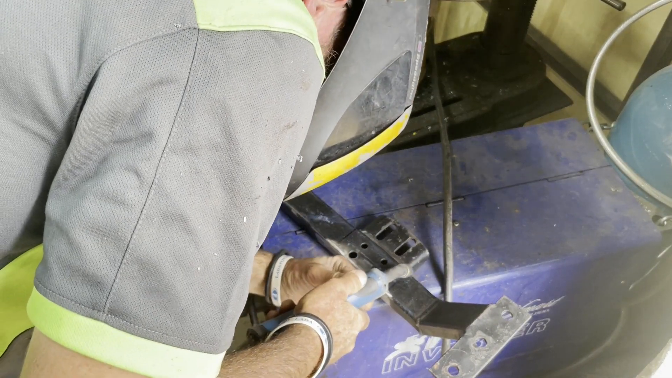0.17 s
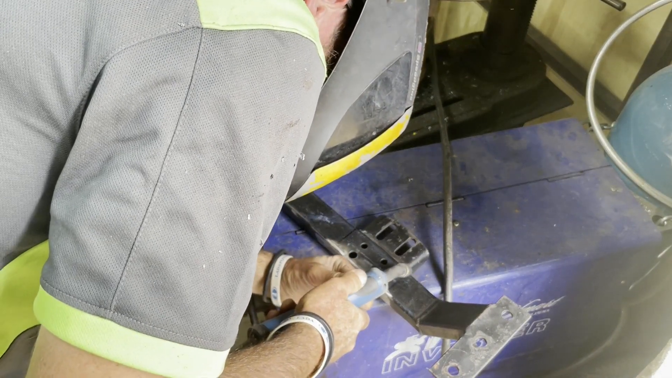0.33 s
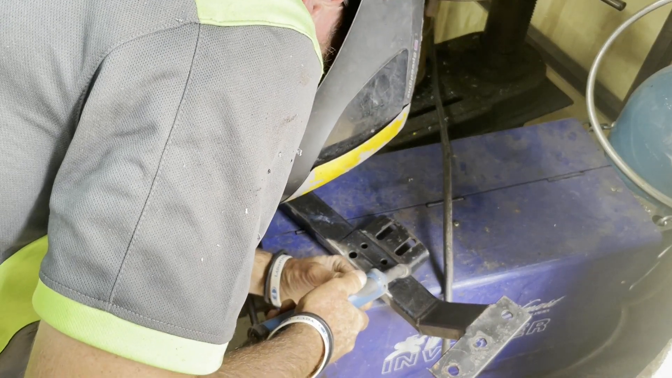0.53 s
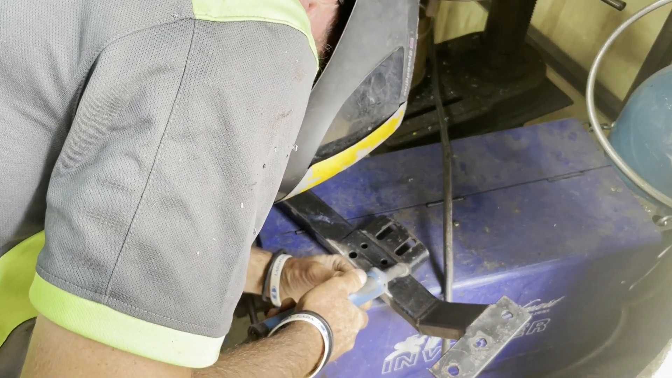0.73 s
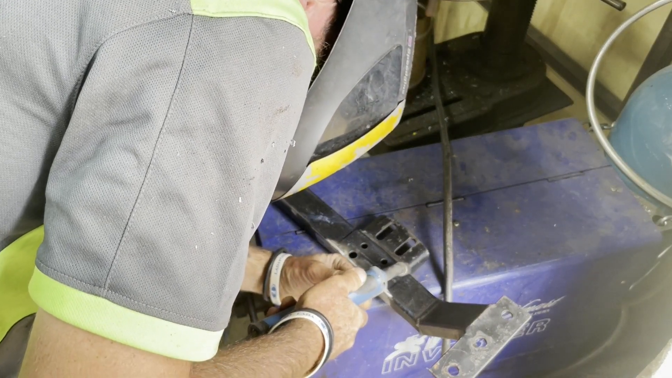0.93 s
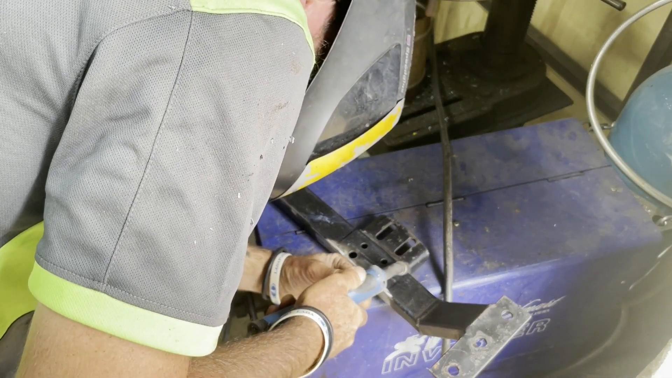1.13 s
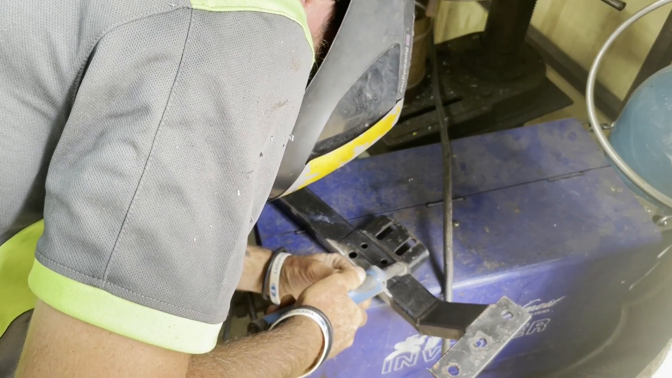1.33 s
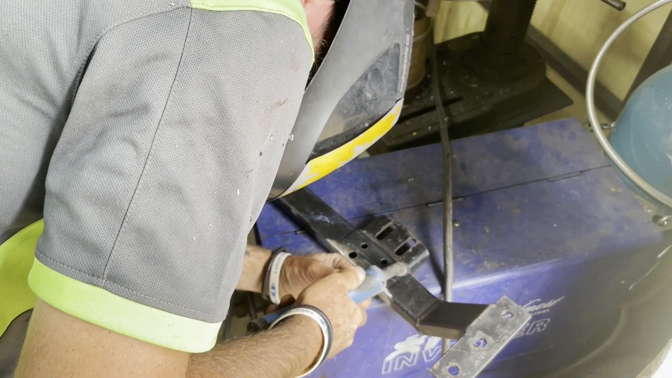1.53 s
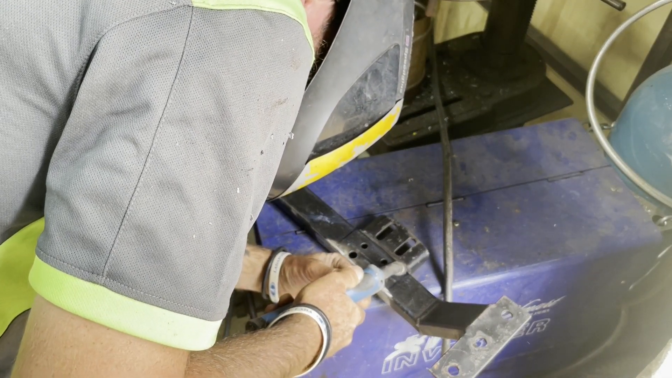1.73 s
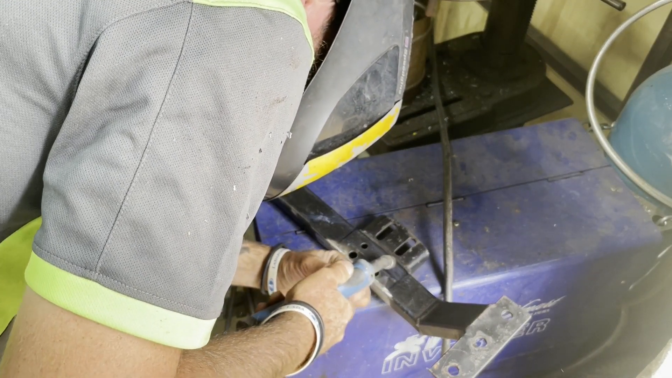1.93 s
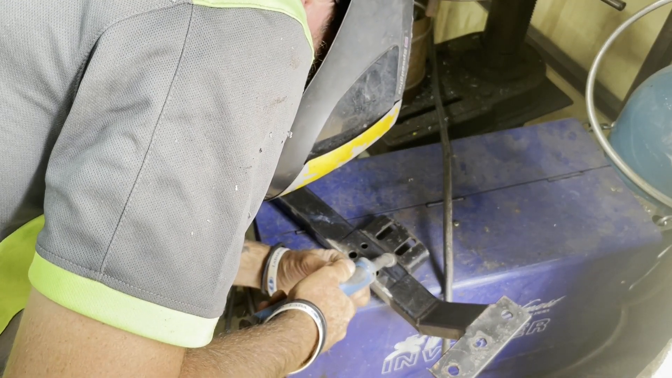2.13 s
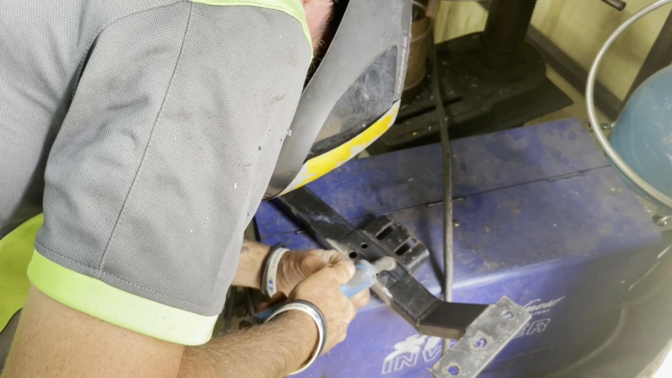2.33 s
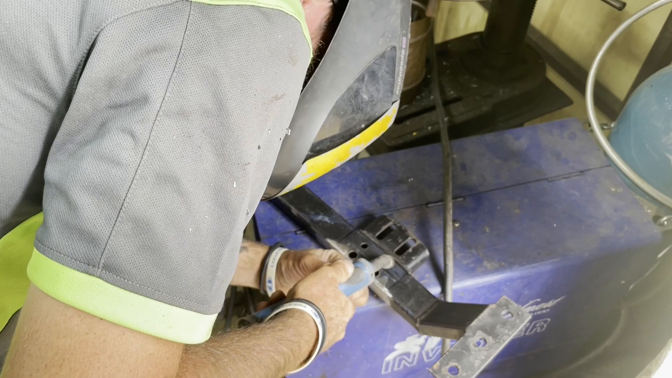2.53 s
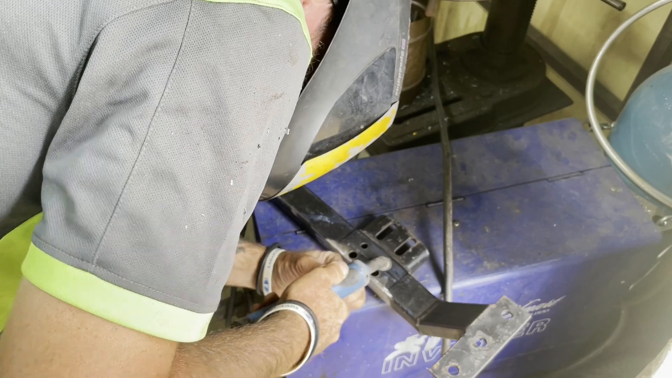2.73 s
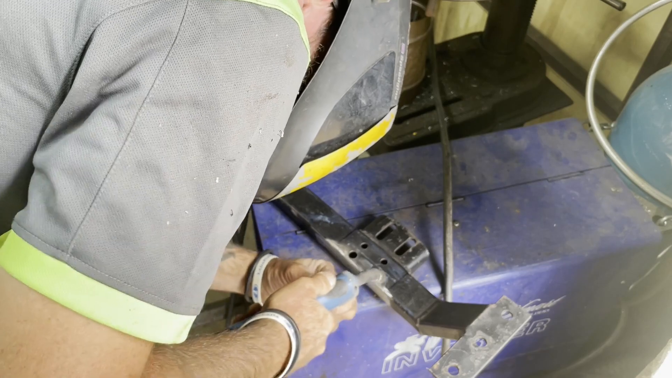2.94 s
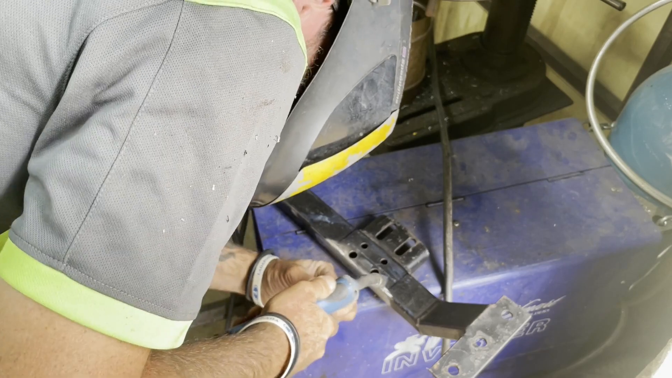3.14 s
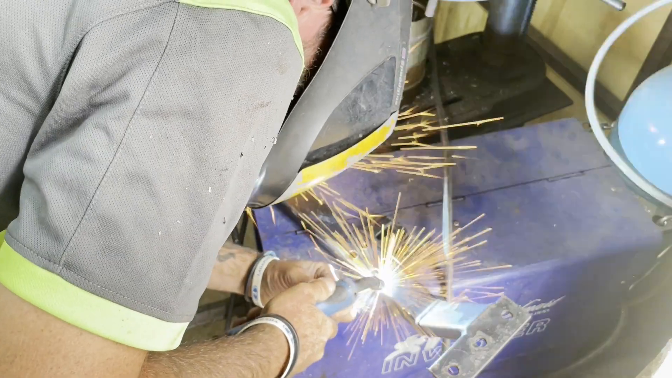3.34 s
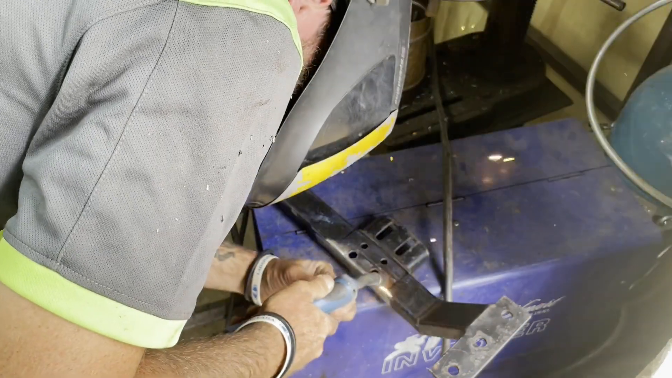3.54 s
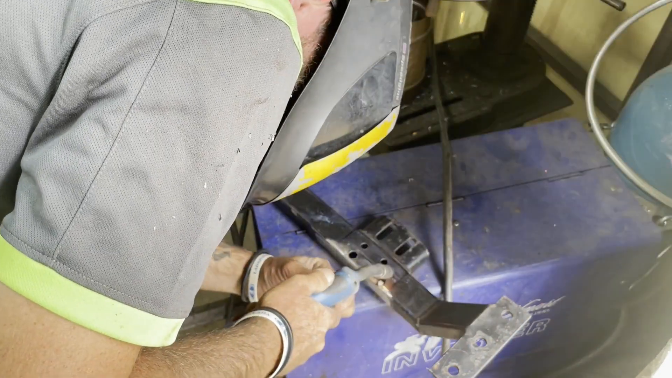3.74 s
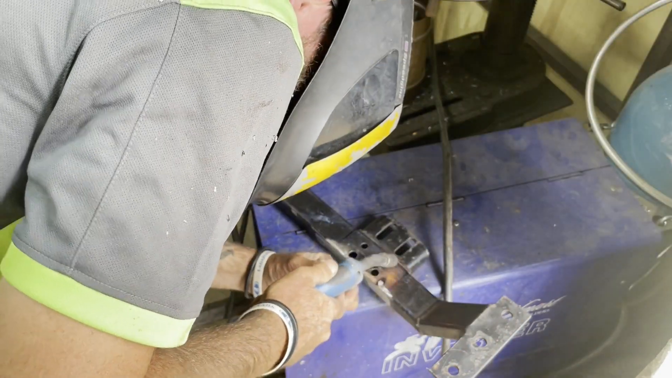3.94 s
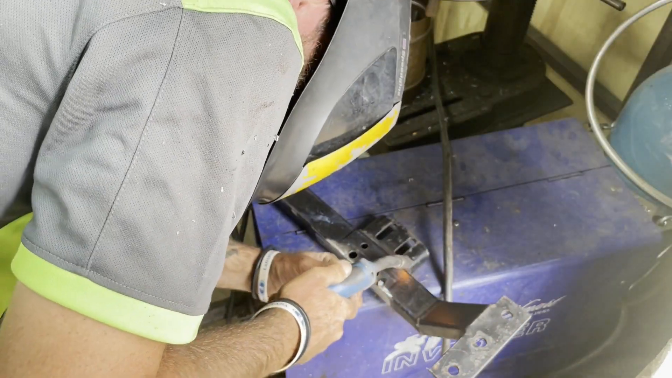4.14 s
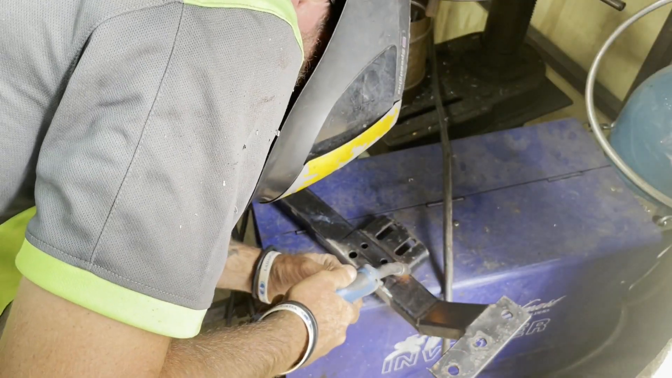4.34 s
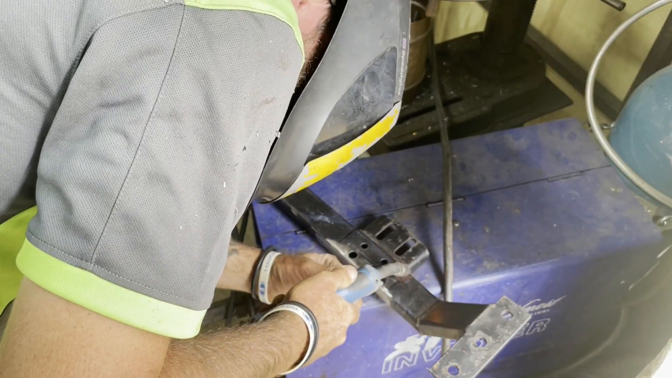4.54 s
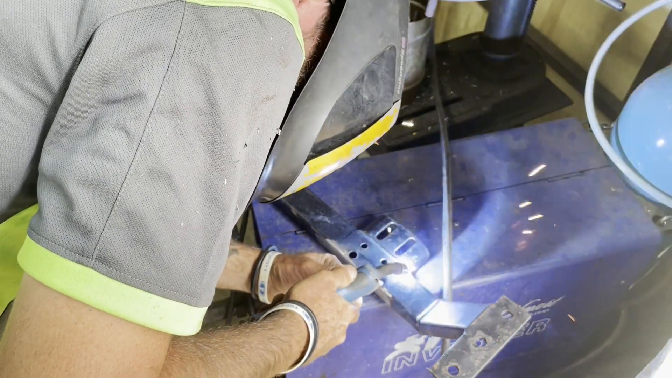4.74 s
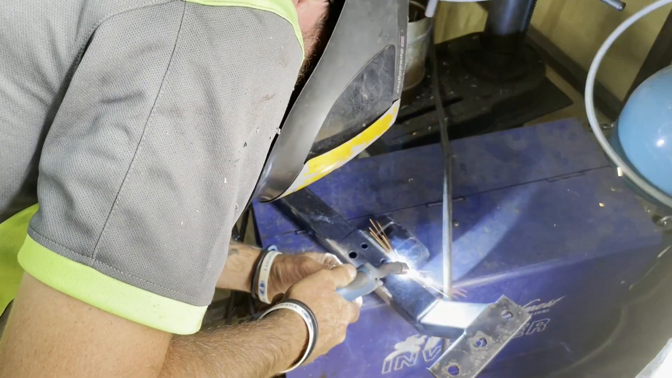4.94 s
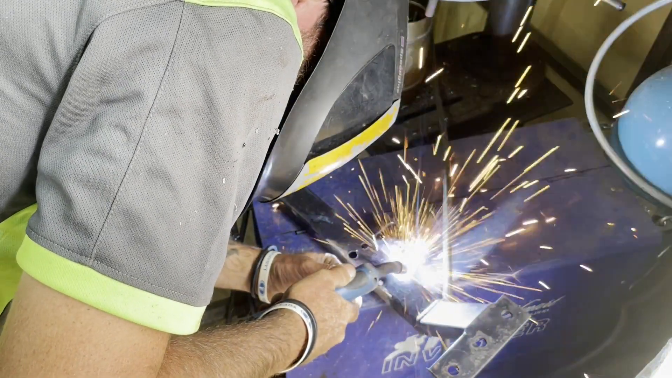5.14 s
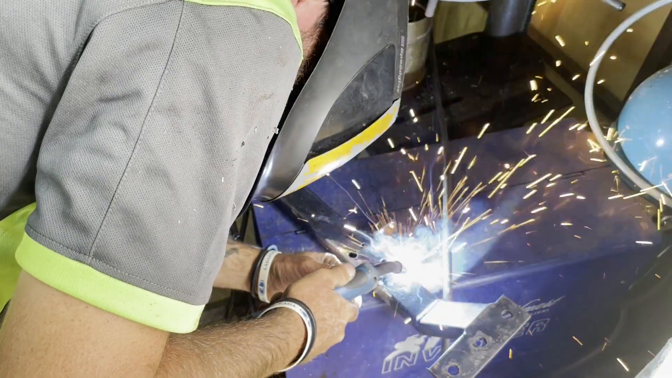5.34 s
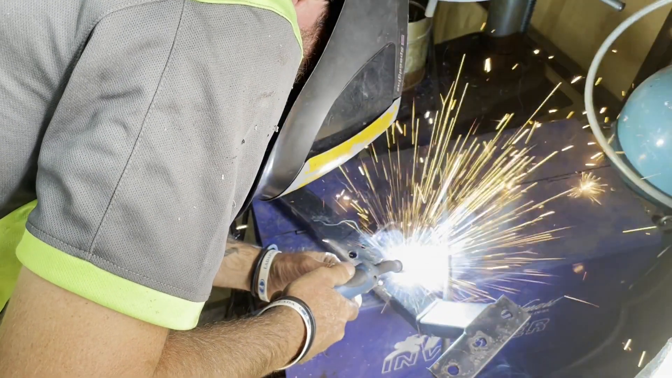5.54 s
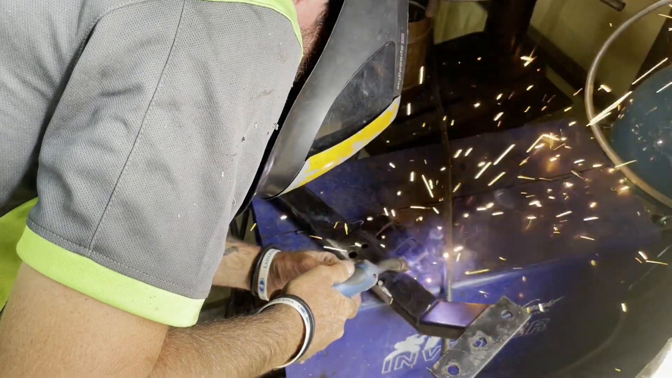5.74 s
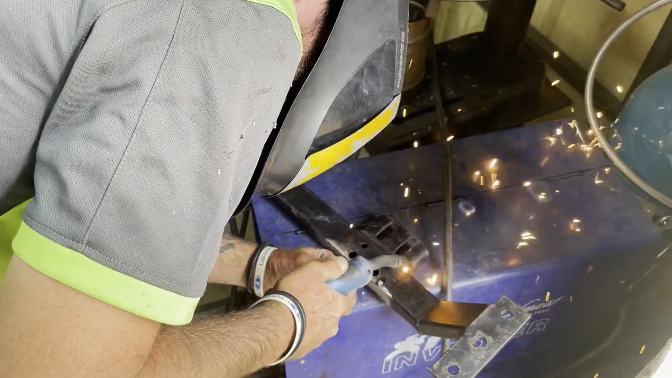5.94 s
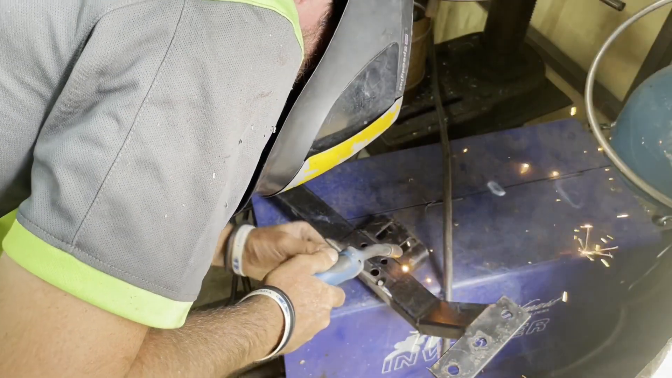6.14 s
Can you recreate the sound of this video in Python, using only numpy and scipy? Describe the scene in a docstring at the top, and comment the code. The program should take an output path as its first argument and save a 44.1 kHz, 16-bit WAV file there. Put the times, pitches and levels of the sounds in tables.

```python
"""A wire-feed welder, close by in a home workshop; its fan hums throughout. At 1.4 s a valve clacks and
shielding gas hisses for a second. At 3.3 s the wire strikes once and the gas flows again. From 4.6 s the
arc sizzles and pops; the recorder's filters smear each crack into a falling low chirp, and its gain, a set
curve here, ducks and lifts the whole background around the loud pops. Near 5.8 s the arc dies, a thin
whistle rises, and the still-running gas is heard faintly over the ducked background."""
import sys
import numpy as np
from scipy import signal
from scipy.fft import irfft
from scipy.io import wavfile
from scipy.ndimage import uniform_filter1d

SR = 44100
rng = np.random.default_rng(int(sys.argv[2]) if len(sys.argv) > 2 else 0)


def master_out(mix):
    """Clip the mix to full scale and print it as 16-bit PCM to the path in sys.argv[1]."""
    frames = np.transpose(np.atleast_2d(mix))
    ceiling = np.clip(frames, -1, 1)
    pcm = np.round(ceiling * 32767).astype(np.int16)
    wavfile.write(sys.argv[1], SR, pcm)


N = 272398
T = np.arange(N) / SR

# Each row: start in seconds, strength in dB, thump in dB, thump rise in ms, polarity +1 or -1.
# The row at 4.655 s is the slow second swing of the first big thump, not a separate pop.
ARC_POPS = [(4.6295, -8, -8, 6, 1), (4.6395, -7, 3, 2.27, 1), (4.655, -27, 1, 16, -1),
            (4.717, -34, -30, 4, 1), (4.848, -20, -27.5, 2.4, -1), (4.9401, -9, -38, 6, 1),
            (4.944, -8, -40, 6, 1), (4.9539, -2, -40, 6, -1), (5.0032, -4, -39, 6, 1),
            (5.0074, -5, -29, 6, -1), (5.0091, -6, -40, 6, 1), (5.0128, -2, -17, 6, -1),
            (5.0177, -5, -40, 6, 1), (5.0209, -3, -24.5, 5.5, -1), (5.0244, -8, -9.5, 4, -1),
            (5.0259, -2, -40, 6, 1), (5.0302, -5, 4.5, 1.8, 1), (5.0549, -4, -0.5, 6, 1),
            (5.1132, -5, -14.5, 2.5, -1), (5.138, -7, -37, 5.5, -1), (5.1425, -11, -40, 6, 1),
            (5.1595, -3, -8.5, 2.4, 1), (5.1727, -5, -36, 6, -1), (5.1813, -5, -29.5, 6, 1),
            (5.189, -5, -6.5, 2.1, -1), (5.1977, -3, -4.5, 2.2, 1), (5.2226, -7, 3.5, 2.17, -1),
            (5.2427, -8, -11.5, 3.7, -1), (5.265, -7, 4.5, 2.8, 1), (5.2826, -5, 3.5, 1.8, -1),
            (5.3003, -11, -3.5, 2, 1), (5.3184, -7, -7, 2.3, 1), (5.3384, -9, 1, 1.74, -1),
            (5.3578, -13, -1, 3.2, 1), (5.3665, -13, -9, 1.5, 1), (5.3769, -11, -9, 4.5, 1),
            (5.3872, -14, -24.5, 3.4, -1), (5.4059, -11, -18.5, 4.2, -1), (5.4192, -6, -2, 2.06, -1),
            (5.4384, -9, -5, 2.6, 1), (5.4475, -12, -36.5, 6, -1), (5.4587, -12, -11.5, 2.2, 1),
            (5.4691, -13, -40, 6, 1), (5.4796, -12, -40, 6, -1), (5.4895, -10, -21.5, 2.5, -1),
            (5.5014, -9, -2, 2.4, -1), (5.532, -4, 3, 1.7, 1), (5.5417, -7, 3.5, 1.7, -1),
            (5.5535, -15, -39.5, 6, -1), (5.5652, -12, -1.5, 1.54, 1), (5.5769, -10, -7.5, 1.2, -1),
            (5.5875, -16, -18, 2.7, -1), (5.6199, -17, -33, 6, 1), (5.6297, -17, -26, 4.4, -1),
            (5.6407, -10, -40, 6, 1), (5.6524, -15, -30, 6, -1), (5.6787, -23, -35, 3.2, 1),
            (5.685, -11, -40, 6, -1), (5.6985, -10, -34, 6, 1), (5.7098, -9, -21, 12, -1),
            (5.7645, -37, -19.5, 3.8, -1)]
# Each row: frequency in Hz, density in dB.
CRACK_SPECTRUM = [(600, -5), (2000, -2), (4000, -3), (5500, -6.5), (7000, 5), (8600, -25), (10000, 2),
                  (13000, 1), (16500, -14.5)]
# Each row: frequency in Hz, left-right likeness from 0 to 1.
ARC_LIKENESS = [(60, 0.99), (500, 1), (1000, 0.51), (2400, 0.86), (5000, 0.48), (8000, 0.39), (13000, 0.95)]


def cracks(boost_db=1.5):
    """Each pop of the arc is an impulse through a causal filter, its phase scattered per pop and side."""
    out, hz = np.zeros((2, N)), np.fft.rfftfreq(256, 1 / SR)
    log_gain = np.log(gain_of(value_at(CRACK_SPECTRUM, hz)))
    minimum_phase = -signal.hilbert(np.r_[log_gain, log_gain[-2:0:-1]]).imag[:len(hz)]
    phase = minimum_phase - 2 * np.pi * hz * 20 / SR  # 20 samples late
    likeness = np.clip(value_at(ARC_LIKENESS, hz), 0, 1)
    for start_s, db, *_ in ARC_POPS:
        shared, *per_side = uniform_filter1d(rng.standard_normal((3, len(hz))), 6, 1)
        scatter = 1.2 * shared + 2.2 * np.sqrt(1 - likeness) * per_side
        click = irfft(np.exp(log_gain + 1j * (phase + scatter)) * stereo_gains(hz))
        add(out, start_s - 0.0005, gain_of(db + boost_db) * click / abs(click).max())
    return out


def thumps(floor_hz=11.0, sweep_cycles=0.921, start_rad=3.8, ring_hz=53):
    """The recorder's allpass filters smear each pop into a low chirp that falls as 1 / time, then rings."""
    out, t = np.zeros((2, N)), np.arange(1, 9000) / SR
    fall_s = np.minimum(t, sweep_cycles / (ring_hz - floor_hz))
    cycles = floor_hz * fall_s + sweep_cycles * np.log(1000 * fall_s) + ring_hz * (t - fall_s)
    chirp = np.sin(2 * np.pi * cycles + start_rad + np.array([[0.2], [-0.2]]))  # right trails
    chirp *= gain_of(np.array([[15], [-15]]) * np.exp(-t / 0.0011))  # the bright start leans left
    decay = 0.42 * np.exp(-t / 0.0026) + 0.59 * np.exp(-t / 0.018) + 0.034 * np.exp(-t / 0.033)
    chirp *= decay * onset(t, 0.0011)
    for start_s, _, db, rise_ms, polarity in ARC_POPS:
        add(out, start_s, polarity * gain_of(db) * chirp * onset(t, rise_ms / 1000))
    return out


# Each row: time in seconds, level in dB.
SIZZLE_CURVE = [(4.6, -120), (4.62, -28), (4.662, -39), (4.768, -38), (4.872, -26), (5.004, -35.5),
                (5.09, -31.5), (5.236, -31.5), (5.418, -36), (5.528, -35.5), (5.66, -42), (5.732, -40.5),
                (5.856, -58.5), (6.0, -79)]
# Each row: start in seconds, level in dB, hold in ms, T60 in seconds, relative thud in dB, dullness 0-1.
ARC_SPITS = [(3.330, -22, 6.5, 0.022, -34, 0.46), (3.333, -14.5, 6.1, 0.079, 2.5, 0.7),
             (3.350, -24.5, 3.9, 0.38, -0.5, 0.54), (4.621, -29.5, 3, 0.02, -19, 0.4),
             (4.893, -35, 6.2, 0.022, -12, 0.6), (4.905, -25, 19, 0.032, -18, 0.33),
             (4.930, -30, 3.7, .015, -18.5, 0.2), (4.939, -22.5, 23, 0.033, -26.5, 0.1),
             (4.975, -19.5, 12, 0.04, -29.5, 0), (4.990, -25.5, 8.2, .03, -21, 0.3),
             (4.998, -29.5, 25, .01, -18, 0.03), (5.055, -21.5, 3.6, 0.033, -16, 0),
             (5.158, -22, 2.1, 0.047, -17, .2), (5.196, -26, 6.7, 0.086, -17, 0),
             (5.265, -21, 16.6, 0.011, -17, 0.25), (5.532, -27.5, 16, .015, -20.5, 0.5)]
# Burning arc and duller cold strike. Each row: frequency in Hz, density in dB.
ARC_SPECTRUM = [(290, -54), (500, -27), (787, -7), (911, -16.5), (1200, -10.5), (1410, -9), (1610, -5),
                (1950, -9), (3300, -5), (5430, -8.5), (6960, -3), (8800, -7), (12900, 0), (15800, -14),
                (16500, -53)]
STRIKE_SPECTRUM = [(530, -43), (900, -5), (1110, -9.5), (2560, -1), (3650, -5), (4380, 1.5), (8450, -14),
                   (12200, -8.5), (15300, -9.5), (15900, -11.5), (16500, -46.5)]
# Modes of the struck part. Each row: frequency in Hz, level in dB, T60 in seconds.
THUD_MODES = [(95, -16, .08), (155, -3, 0.033), (252, 3.5, 0.022), (424, -0.5, 0.032), (560, -2.5, 0.032),
              (817, -10, 0.028)]


def arc(echo_db=-25.5, echo_t60_s=0.04):
    """The arc fries and spits; each spit mixes bright and dull noise over a dry thud."""
    bright, dull, thuds, t = level_curve(SIZZLE_CURVE), np.zeros(N), np.zeros(N), T[:4000]
    thud = sum((-1) ** k * gain_of(db - 60 * t / t60_s) * np.sin(2 * np.pi * hz * t)
               for k, (hz, db, t60_s) in enumerate(THUD_MODES))
    for start_s, sharp, bass, dullness in burst_envelopes(ARC_SPITS, rise_s=0.00073, bass_stretch=1):
        add(bright, start_s, sharp * np.sqrt(1 - dullness))
        add(dull, start_s, sharp * np.sqrt(dullness))
        add(thuds, start_s + 0.00129, -bass.max() * thud)
    for start_s, db, *_ in ARC_POPS:  # echo tails off bench and walls
        add(bright, start_s, gain_of(db + echo_db - 60 * t / echo_t60_s))
    sputter = unit_rms(gain_of(1.8 * wander(N, 30)))
    fry = bright * noise(ARC_SPECTRUM, patchy_db=1.0, flicker_db=2.0, likeness=ARC_LIKENESS)
    fry += dull * noise(STRIKE_SPECTRUM, patchy_db=1.0, likeness=ARC_LIKENESS)
    return fry * sputter + thuds


# Each row: start in seconds, level in dB, hold in ms, T60 in seconds, relative case ring in dB.
VALVE_CLACKS = [(1.438, -29, 4, 0.19, -3.5), (2.44, -52, 5.3, 0.21, 13.5), (2.826, -60.5, 6, 0.34, -12),
                (3.274, -31, 9.3, 0.28, -4), (3.465, -41, 1.4, 0.02, 12), (3.493, -49, 1, .02, -5),
                (3.565, -39.5, 1.5, 0.026, 13), (3.572, -63.5, 42, 0.34, 28.5),
                (4.36, -67.5, 3.9, 0.14, 31.5), (4.587, -31.5, 4.9, 0.41, -3.5),
                (4.786, -59, 28, 0.18, 16.5), (5.93, -68.5, 5.3, .04, 10.5)]
# Each row: frequency in Hz, density in dB.
CLACK_SPECTRUM = [(710, -43.5), (1200, -10.5), (3150, -14.5), (4730, -9.5), (5630, -18), (6290, -3.5),
                  (7830, -0.5), (9430, -8.5), (10200, -1), (13300, -16), (14200, -17), (15600, -2.5),
                  (16500, -31)]
# Each row: frequency in Hz, width in Hz, level in dB.
CASE_MODES = [(204, 170, -6.5), (378.5, 81, -4.5), (600, 150, -3), (960, 180, -4.5)]


def clacks(snap_s=0.003, upper_ring_s=0.02):
    """Valve clacks and small knocks ring the welder's case; its upper modes die first."""
    bright, upper, low = np.zeros((3, N))
    for start_s, sharp, bass in burst_envelopes(VALVE_CLACKS, rise_s=0.0013, bass_stretch=0.75):
        t = T[:len(sharp)]
        add(bright, start_s, sharp * (1 + 1.6 * np.exp(-t / snap_s)))  # the plunger snaps home
        add(upper, start_s, bass * np.exp(-t / upper_ring_s))
        add(low, start_s, bass)
    clack = bright * noise(CLACK_SPECTRUM, patchy_db=2.5)
    return clack + low * resonances(CASE_MODES[:2]) + upper * resonances(CASE_MODES[2:])


# Each row: hiss becomes audible in seconds, starts to fade in seconds, hiss in dB, nozzle tones in dB.
# The last row is the still-running gas, heard faintly after the arc.
GAS_FLOWS = [(1.432, 2.43, -43, -46), (3.422, 4.38, -45, -44), (5.776, 6.3, -65, -65)]
# Each row: frequency in Hz, density in dB.
HISS_SPECTRUM = [(710, -36.5), (1200, -9.5), (1410, -20.5), (1600, -11), (1820, -6.5), (2450, -9),
                 (3970, -11.5), (4280, -14.5), (5330, -11), (7250, -14.5), (9330, -13.5), (10400, -16.5),
                 (15100, -21), (16000, -33), (16500, -57)]
# Each row: frequency in Hz, width in Hz, level in dB.
NOZZLE_MODES = [(1607, 86, -6), (1816, 270, -0.5), (2061, 97, -7)]
# Each row: peak in seconds, half length in seconds, band centre in Hz, level at full flow in dB.
HISS_SWELLS = [(1.483, .03, 9600, -49), (1.6, .2, 12400, -49.5), (1.63, .2, 6000, -48.5),
               (1.837, .08, 9400, -54), (2.34, .12, 9300, -48.5), (2.43, .08, 13400, -58),
               (3.44, .05, 9450, -45), (3.454, .1, 5840, -46), (3.617, .1, 13400, -54),
               (4.05, .25, 9500, -53), (4.13, .06, 13300, -54), (4.344, .12, 5680, -46),
               (4.392, .12, 13000, -49.5), (6.147, .15, 13000, -51)]


def gas(swell_q=5.7):
    """Shielding gas hisses and sounds fuzzy tones in the nozzle; broad bands come and go."""
    hiss_gain = gas_envelope(level_column=2, rise_s=0.046, fall_db_per_s=67)
    nozzle_gain = gas_envelope(level_column=3, rise_s=0.075, fall_db_per_s=142)
    swells = sum(bell(peak_s, half_s, db) * resonances([(hz, hz / swell_q, 0)])
                 for peak_s, half_s, hz, db in HISS_SWELLS)
    hiss = hiss_gain * noise(HISS_SPECTRUM, patchy_db=2.0)
    tones = nozzle_gain * unit_rms(resonances(NOZZLE_MODES))
    return hiss + tones + swells * hiss_gain / hiss_gain.max()


def gas_envelope(level_column, rise_s, fall_db_per_s):
    """Each stretch of audible gas builds, holds and fades."""
    gain = np.zeros(N)
    for row in GAS_FLOWS:
        heard_s, fading_s = np.maximum(T - row[0], 0), np.maximum(T - row[1], 0)
        gain += onset(heard_s, rise_s) * gain_of(row[level_column] - fall_db_per_s * fading_s)
    return gain


# Each row: start and rise time in seconds, first and last pitch in Hz, first and last level in dB.
WHISTLE_GLIDES = [(3.465, 0.021, 3150, 3350, -40, -37.5), (5.725, .155, 3140, 3580, -53, -46)]


def whistles(curl=1.3, octave_db=-16, break_s=0.0088, drop_db=-18):
    """Thin rough whistles rise ever faster and swell, then break off to a faint tail."""
    out = np.zeros(N)
    for start_s, rise_s, first_hz, last_hz, first_db, last_db in WHISTLE_GLIDES:
        t = np.arange(0, 1.6 * rise_s, 1 / SR)
        hz = first_hz + (last_hz - first_hz) * np.minimum(t / rise_s, 1) ** curl
        hz *= 1 + 0.02 * wander(len(t), 60)
        phase = 2 * np.pi * np.cumsum(hz) / SR
        db = np.interp(t, [0, rise_s, rise_s + break_s], [first_db, last_db, last_db + drop_db])
        flutter_db = 3.5 * wander(len(t), 150)
        tone = gain_of(db + flutter_db) * (np.sin(phase) + gain_of(octave_db) * np.sin(2 * phase))
        add(out, start_s, np.sqrt(2) * tone * signal.windows.tukey(len(t), 0.2))
    return out * gain_of([[1.5], [-1.5]])


# Each row: frequency in Hz, density in dB.
FAN_SPECTRUM = [(41, -29.5), (70, -11), (128, -2), (228, -9), (305, -27), (341, -12.5), (417, -11.5),
                (446, -14.5), (667, -15), (745, -11.5), (911, -17), (2840, -25.5), (5810, -39), (6790, -40),
                (14500, -53.5)]
# Each row: frequency in Hz, width in Hz, level in dB.
FAN_MODES = [(630, 19, -65), (766, 14, -63.5), (3490, 610, -72.5)]
# The recorder's automatic gain around the loud pops, as a set curve. Each row: time in seconds, gain in dB.
DUCKING_CURVE = [(4.62, 1.5), (4.7, -5), (5.0, -0.5), (5.3, 8.5), (5.8, -17), (6.18, -19.5)]
# Each row: peak in seconds, half length in seconds, level in dB. The one at 4.78 s is the big thump's tail.
RUMBLE_SWELLS = [(.26, 0.061, -42.5), (0.408, 0.054, -43), (0.653, 0.1, -47.5), (.87, 0.047, -48),
                 (1.112, .03, -45), (1.34, 0.069, -45), (1.56, 0.034, -41), (1.697, .03, -47),
                 (1.85, .05, -58), (2.05, .08, -59), (2.55, .2, -58), (3.79, 0.048, -55),
                 (4.55, 0.099, -59), (4.78, .07, -35), (4.97, .04, -51)]


def workshop(hum_hz=336, hum_db=-54.5, whine_hz=15150, whine_db=-83.5, fan_db=-48, rumble_db=-66.5):
    """Steady fan, hum, whine and rumble, ducked and lifted by the recorder's gain, plus low swells."""
    waver = wander(N, 3000)
    hum = gain_of(hum_db + 1.7 * waver) * np.sqrt(2) * np.sin(2 * np.pi * hum_hz * T + 0.25 * waver)
    whine = gain_of(whine_db) * np.sqrt(2) * np.sin(2 * np.pi * whine_hz * T + 1.2 * waver)
    fan = gain_of(fan_db) * noise(FAN_SPECTRUM, patchy_db=2.0) + resonances(FAN_MODES)
    ducking = level_curve(DUCKING_CURVE)
    rumble_gain = gain_of(rumble_db) * ducking + sum(bell(*row) for row in RUMBLE_SWELLS)
    rumble = unit_rms(resonances([(58.7, 19.3, 0)]).mean(0)) * rumble_gain
    low_cut = signal.butter(4, 40, "high", fs=SR, output="sos")
    return signal.sosfilt(low_cut, (fan + hum + whine) * ducking + rumble)


# Each row: frequency in Hz, left-right likeness from 0 to 1.
ROOM_LIKENESS = [(60, 0.99), (380, 0.88), (800, 0.45), (1400, 0.6), (2400, 0.85), (6000, 0.45), (9000, 1),
                 (15000, 0.99)]


def noise(spectrum, patchy_db, flicker_db=0.0, likeness=ROOM_LIKENESS):
    """Stereo noise of rms 1 with drifting spectral patches and wide-band flicker."""
    frames, hz = N // 128 + 5, np.fft.rfftfreq(512, 1 / SR)
    left_re, left_im, own_re, own_im, patches = rng.standard_normal((frames, 257, 5)).T
    patches = unit_rms(uniform_filter1d(uniform_filter1d(patches, 6, 0), 24, 1))
    shared = np.clip(value_at(likeness, hz), -1, 1)[:, None]
    left = left_re + 1j * left_im
    right = shared * left + np.sqrt(1 - shared ** 2) * (own_re + 1j * own_im)
    db = value_at(spectrum, hz)[:, None] + patchy_db * patches + flicker_db * rng.standard_normal(frames)
    bins = np.array([left, right]) * gain_of(db) * stereo_gains(hz)[..., None]
    return unit_rms(signal.istft(bins, nperseg=512, noverlap=384)[1][:, :N])


# Each row: frequency in Hz, left minus right in dB.
STEREO_BALANCE = [(60, -1.5), (380, 0.5), (950, 0), (2400, 3.5), (6000, 1.5), (12000, 0)]
# Each row: frequency in Hz, left phase lead in radians.
STEREO_PHASE = [(60, 0), (600, .3), (1120, -.2), (1600, -.1), (3100, .75), (4130, .5), (5250, 1.2),
                (5600, -1.3), (6900, -.7), (7410, -1.5), (7840, .1), (16400, 0)]


def stereo_gains(hz):
    """Complex gains of the left and right microphone."""
    left = gain_of(value_at(STEREO_BALANCE, hz) / 2) * np.exp(0.5j * value_at(STEREO_PHASE, hz))
    return np.array([left, 1 / left])


def resonances(modes):
    """Stereo noise ringing in modes, each filtered twice."""
    drive, out = rng.standard_normal(N) + 0.3 * rng.standard_normal((2, N)), 0
    for hz, width_hz, db in modes:
        peak = signal.iirpeak(hz, hz / width_hz, SR)
        out = out + gain_of(db) * unit_rms(signal.lfilter(*peak, signal.lfilter(*peak, drive)))
    return out


def burst_envelopes(rows, rise_s, bass_stretch):
    """Per burst, a sharp rise-hold-decay envelope and a softer one for the bass."""
    t = np.arange(SR // 2) / SR
    for start_s, db, hold_ms, t60_s, bass_db, *rest in rows:
        fall_db = 60 * np.maximum(t - hold_ms / 1000, 0) / t60_s
        sharp = gain_of(db - fall_db) * (1 - np.exp(-t / rise_s))
        bass = gain_of(db + bass_db - fall_db / bass_stretch) * (1 - np.exp(-t / 0.0034))
        yield start_s, sharp, bass, *rest


def onset(t, rise_s):
    """S-shaped rise from 0 to 1."""
    return 1 - np.exp(-(t / rise_s) ** 2)


def bell(peak_s, half_s, db):
    """Bell-shaped swell."""
    return gain_of(db) * np.exp(-((T - peak_s) / half_s) ** 2)


def wander(count, smooth_samples):
    """Smoothed noise of rms 1."""
    return unit_rms(uniform_filter1d(rng.standard_normal(count), smooth_samples))


def level_curve(points):
    """Amplitude over time from a dB curve, held beyond its ends."""
    times_s, db = np.transpose(points)
    return gain_of(np.interp(T, times_s, db))


def value_at(points, hz):
    """Interpolates a table over log frequency."""
    table_hz, values = np.transpose(points)
    return np.interp(np.log(hz + 1), np.log(table_hz + 1), values)


def gain_of(db):
    """Decibels to amplitude."""
    return 10 ** (np.asarray(db) / 20)


def unit_rms(x):
    """Scales to rms 1."""
    return x / np.sqrt(np.mean(x ** 2) + 1e-20)


def add(mix, start_s, sound):
    """Mixes a sound in at start_s."""
    part = mix[..., round(start_s * SR):][..., :sound.shape[-1]]
    part += sound[..., :part.shape[-1]]


def scene():
    """All sources together."""
    return workshop() + gas() + clacks() + whistles() + arc() + cracks() + thumps()


def record(dry):
    """Soft overload on the loudest pops, then a 16.5 kHz band limit."""
    ceiling = 0.9
    limited = dry / (1 + abs(dry / ceiling) ** 4) ** 0.25
    low_pass = signal.firwin(511, 16500, window=("kaiser", 9), fs=SR)
    return signal.oaconvolve(limited, low_pass[None], "same")


dry = scene()
out = record(dry)
master_out(out)
```